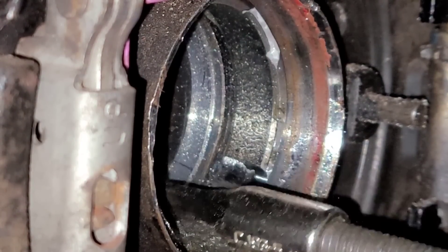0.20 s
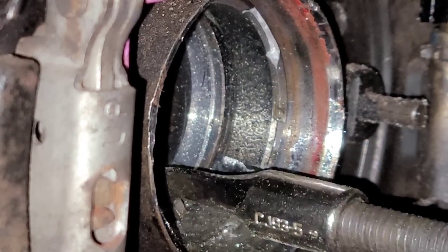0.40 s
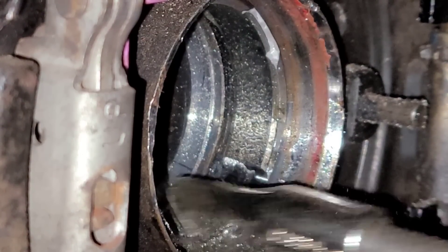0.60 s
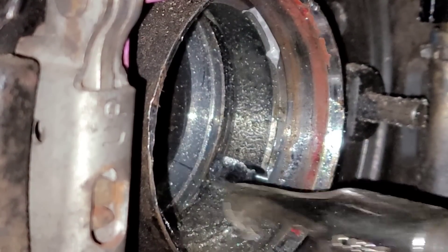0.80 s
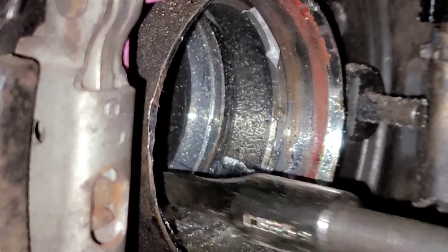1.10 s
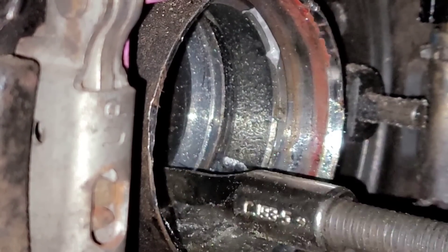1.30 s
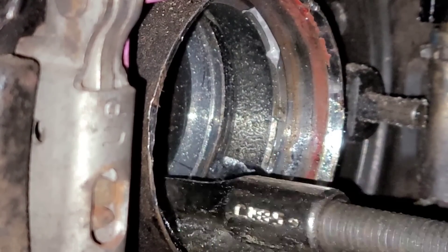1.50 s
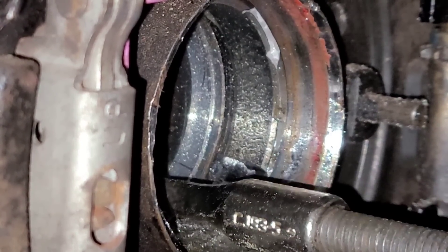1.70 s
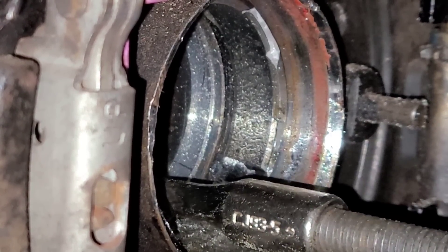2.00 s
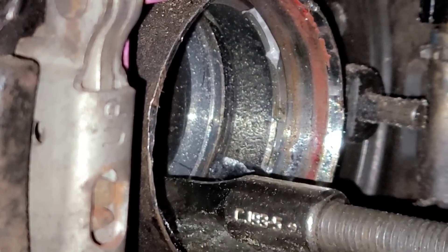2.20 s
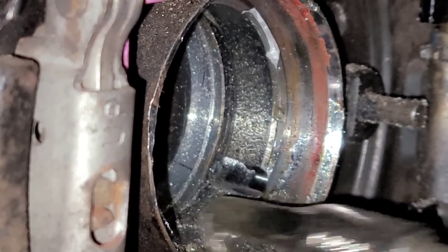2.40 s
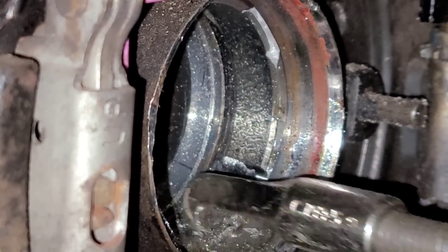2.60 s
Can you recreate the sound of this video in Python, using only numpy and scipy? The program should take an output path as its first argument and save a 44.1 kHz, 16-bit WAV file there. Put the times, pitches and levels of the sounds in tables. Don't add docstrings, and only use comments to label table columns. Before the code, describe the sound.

A small slide hammer slams its stop three times, sharp bright metal clacks with light rattling between

```python
import sys
import numpy as np
from scipy import signal
from scipy.fft import rfft, irfft
from scipy.io import wavfile
from scipy.ndimage import uniform_filter1d

SR = 44100
rng = np.random.default_rng(int(sys.argv[2]) if len(sys.argv) > 2 else 0)


def master_out(mix):
    frames = np.transpose(np.atleast_2d(mix))
    ceiling = np.clip(frames, -1, 1)
    pcm = np.round(ceiling * 32767).astype(np.int16)
    wavfile.write(sys.argv[1], SR, pcm)


def level_to_linear(level):
    exponent = np.asarray(level, float) / 20
    return 10 ** exponent


N = 119070
T = np.arange(N) / SR

# t/s, chatter level/dB, thump level/dB, sway level/dB, axle ring level/dB
BLOWS = [
    (0.224, -24, -55, -50, -35.5),
    (0.6476, -23.5, -42.5, -48, -33.5),
    (2.3895, -21.5, -45, -41, -41.5),
]
# f/Hz, spectral level/dB per Hz
STEEL = [(180, -39.5), (300, -3.5), (496, 2), (1450, -4), (3190, -3.5), (7260, -4.5), (13500, -1),
         (15700, 7), (16500, -42.5)]
# f/Hz, width/Hz, level/dB
ROD = [(3280, 68, -11.5), (3965, 300, -21), (6476, 400, -13), (8100, 300, -11.5), (10826, 310, -6),
       (11250, 200, -30), (11900, 250, -12), (13140, 250, -5), (13750, 480, -13), (16540, 610, -12.5)]


def unit(x):
    return x / np.sqrt(np.mean(x ** 2))


def curve(points, hz):
    p = np.array(points, float)
    return np.interp(np.log(hz + 1), np.log(p[:, 0]), p[:, 1])


def colour(x, points, scale=1):
    gain = level_to_linear(scale * curve(points, np.fft.rfftfreq(N, 1 / SR)))
    return irfft(rfft(x) * gain, N)


def ring(x, hz, width):
    r = np.exp(-np.pi * width / SR)
    a = [1, -2 * r * np.cos(2 * np.pi * min(hz, SR / 2.2) / SR), r * r]
    b = np.array([1, 0, -1]) * np.sqrt((1 - r * r) / 2)
    return signal.lfilter(b, a, x)


def body(x, modes, patchy_db=0):
    total = 0
    for k, (hz, width, db) in enumerate(modes):
        feed = x * level_to_linear(patchy_db * walk(25.21))
        total = total + (-1) ** k * level_to_linear(db) * ring(feed, hz, width)
    return total


def walk(rate):
    k = int(SR / rate)
    held = np.repeat(rng.standard_normal(N // k + 1), k)
    return 1.15 * uniform_filter1d(held, k)[:N]


def grit(db):
    clicks = rng.standard_normal((3, N)) * level_to_linear(db * rng.exponential(size=(3, N)))
    return unit(clicks[0] + 0.5 * clicks[1:])


def fall(s, tau):
    return (T >= s) * np.exp(-np.maximum(T - s, 0) / tau)


def pulse(s, rise_s, fall_s):
    return fall(s, fall_s) * (1 - fall(s, rise_s))


def pan(db):
    return level_to_linear(np.outer([0.5, -0.5], db))


def hammer():
    # hiss level/dB, then level/dB of each squeal band
    runups = [(-18, -22, -22, -17, -30), (-21.5, -25, -28, -23, -20), (-15, -25, -25, -28, -21)]
    # f/Hz, width/Hz
    squeal = [(3200, 400), (9000, 2100), (13600, 1500), (15500, 900)]
    # f/Hz, width/Hz, level/dB
    sings = [(10800, 300, -9), (10800, 500, -13), (13330, 200, -3)]
    blow_pan = [0, -1, -4]
    gap_s, skip_s = 0.0022, 0.0007
    rise_s, far_s, far_db = 0.0069, 0.09, -35
    hold_s, chatter_fall_s = 0.008, 0.0032
    rough = level_to_linear(2.2 * walk(700))
    steel, plain = unit(colour(grit(3.2), STEEL)), grit(1.1)
    impact, shimmer, rush, rings = 0, 0, 0, 0
    for (s, db, *_), (hiss_db, *squeal_db), sing in zip(BLOWS, runups, sings):
        lift = s - gap_s
        d = np.minimum(T - lift, 0)
        swell = np.exp(d / rise_s) + level_to_linear(far_db) * np.exp(d / far_s)
        up = rough * swell * np.where(T < lift, 1, fall(lift, skip_s))
        rush = rush + up * level_to_linear(hiss_db)
        squeals = sum(level_to_linear(b) * ring(plain, *band) for b, band in zip(squeal_db, squeal))
        chatter = (T >= s) * np.exp(-np.maximum(T - s - hold_s, 0) / chatter_fall_s)
        impact = impact + level_to_linear(db) * (chatter * rough + level_to_linear(6) * fall(s, 0.0012))
        shimmer = shimmer + level_to_linear(db - 10.5) * fall(s, 0.043)
        rings = rings + up * squeals + level_to_linear(db) * body(plain * fall(s, 0.044), [sing])
    side = pan(np.interp(T, [b[0] for b in BLOWS], blow_pan))
    cracks, tones = strikes(steel)
    rod = level_to_linear(3) * body(plain * (impact + level_to_linear(-4) * shimmer), ROD, 2.5)
    crash = side * (steel * (impact + rush + shimmer) + cracks)
    return crash, side * (tones + tails()) + rings + rod


def strikes(steel):
    # t/s, tone level/dB, tone f/Hz, crack level/dB
    contacts = [(.2108, -20, 13700, -34), (.2142, -17, 13800, -34), (.2153, -21, 9250, -34),
                (.2173, -9, 13600, -24), (.2206, -9, 13500, -26), (.2244, -7, 13200, -17),
                (.2250, -12, 10800, -30), (.2266, -13, 10700, -24), (.2288, -10, 13200, -26),
                (.2306, -12, 10800, -26), (.2345, -16, 13200, -30), (.6420, -17, 15200, -30),
                (.6435, -12, 3100, -28), (.6478, -12, 10900, -20), (.6508, -13, 11500, -17),
                (.6545, -17, 10800, -22), (.6590, -15, 11300, -30), (2.3770, -26, 3100, -36),
                (2.3800, -17, 10700, -34), (2.3830, -14, 3180, -30), (2.3855, -15, 3100, -29),
                (2.3897, -11, 3830, -18), (2.3903, -6, 10900, -22), (2.3938, -13, 13400, -22),
                (2.3968, -20, 10900, -24), (2.4000, -17, 13400, -28)]
    cracks, tones = 0, np.zeros((2, N))
    for s, db, hz, crack_db in contacts:
        tone = np.sin(2 * np.pi * hz * (T - s))
        tones = tones + level_to_linear(db) * 3 * pulse(s, 0.0005, 0.001) * tone
        cracks = cracks + level_to_linear(crack_db + 5) * fall(s, 0.0007) * steel
    return cracks, tones


def tails():
    # f/Hz, level/dB, t60/s
    first = [(3895, -44, .4), (6476, -39, .3), (8247, -42, .33), (13360, -32, .18), (15650, -33, .2)]
    # f/Hz, level/dB, t60/s
    second = [(4538, -42, .22), (6799, -41, .22), (8656, -36, .12), (10760, -42, .5), (15330, -40, .3)]
    # f/Hz, level/dB, t60/s
    third = [(688, -43, .7), (830, -36, .25), (6476, -40, .29), (11680, -35, .16), (13300, -36, .46)]
    tones = np.zeros((2, N))
    for (s, *_), modes in zip(BLOWS, (first, second, third)):
        for hz, db, t60 in modes:
            phase = 2 * np.pi * (hz * T + rng.random((2, 1)))
            tones = tones + level_to_linear(db + 4 * walk(60)) * fall(s, t60 / np.log(1000)) * np.sin(phase)
    return tones


def shove(start, hz, width, width_2):
    x = ring(ring(pulse(start, 0.002, 0.004), hz, width), hz, width_2)
    return 10 * x / np.abs(x).max()


def axle():
    # f/Hz, level/dB, t60/s
    axle_modes = [(209.13, 3.5, 0.32), (295.3, -7, 3.6), (370, -10.5, 5.0), (507.5, -3, 1.06),
                  (622, -23.5, 0.6), (701, -10, 0.1), (801, -5, 0.11)]
    # f/Hz, spectral level/dB per Hz
    bloom = [(50, -11), (90, -7), (140, -2), (220, 7.5), (330, 2), (500, -2.5), (800, -12), (1500, -22)]
    boom_level = [1.5, -1.5, -2.5]
    boom_long = [1, 2, -12]
    thump_late = [0, .006, 0]
    lag_s = np.array([[0.004], [0]])
    a = rng.standard_normal((3, N))
    frame = unit(colour(a[1:] + 0.5 * a[0], bloom))
    out = 0
    for blow, boom_db, long_db, late_s in zip(BLOWS, boom_level, boom_long, thump_late):
        s, _, thump_db, sway_db, ring_db = blow
        thump = level_to_linear(thump_db) * shove(s + late_s - 0.014 + lag_s / 2, 68, 40, 68) * pan(2.4)
        sway = -level_to_linear(sway_db) * shove(s + 0.006 + 2 * lag_s, 29, 34, 58) * pan(3.8)
        shake = rng.standard_normal(N) * fall(s, 0.05)
        rings = 0
        for hz, db, t60 in axle_modes:
            width = np.log(1000) / np.pi / min(t60, 0.8)
            rings = rings + level_to_linear(db) * unit(ring(shake, hz, width))
        decay = fall(s, 0.048) + level_to_linear(-17 + long_db) * fall(s, 0.32)
        boom = level_to_linear(5.5 + boom_db) * (1 - fall(s, 0.021)) * decay * frame
        out = out + thump + sway + level_to_linear(ring_db) * (level_to_linear(-27.5) * rings + boom)
    return out


def hook():
    # t/s, peak level/dB, treble level/dB, hub level/dB
    ticks = [(0.1718, -17, -27, -48), (0.6047, -36, -44, -40), (0.8887, -32.5, -26, -47),
             (0.9307, -37.5, -26.5, -65), (1.0041, -36.5, -68, -40.5), (1.0985, -35.5, -46, -50),
             (1.2135, -44.5, -23, -56.5), (1.268, -36, -28, -69), (1.3245, -33, -66, -52),
             (1.3411, -38, -46, -56), (1.599, -33, -55, -36), (1.7005, -54.5, -57, -73),
             (1.8688, -37.5, -58.5, -54.5), (2.149, -39, -95, -46.5), (2.3395, -40, -38, -42),
             (2.42, -50, -60, -26), (2.5147, -29.5, -38, -36)]
    # start t/s, length/s, hook level/dB, hub level/dB, hiss level/dB
    scrapes = [(-.06, 0.16, -72, -63, -60.5), (0.07, 0.11, -54, -59, -71), (0.212, 0.04, -54, -73, -52.5),
               (0.535, 0.13, -60.5, -49, -71), (0.61, 0.1, -43, -57, -37.5), (0.867, 0.062, -55, -62, -52),
               (0.974, 0.092, -61.5, -62, -74.5), (1.116, 0.11, -59.5, -68, -62.5),
               (1.313, 0.056, -57, -61, -57), (1.795, 0.059, -72, -74, -69), (1.862, 0.11, -62, -56.5, -62),
               (2.002, 0.099, -64, -57.5, -59.5), (2.059, 0.12, -56.5, -51, -57),
               (2.12, .08, -60, -54, -66), (2.18, 0.1, -59, -52, -63), (2.24, 0.07, -54, -62, -57),
               (2.325, .05, -60, -50, -55)]
    # f/Hz, width/Hz, level/dB
    hook_modes = [(1665, 90, 1.5), (1857, 57, 1.5), (2021, 210, -7.5), (2523, 150, -15), (3100, 150, -10),
                  (3650, 120, -12), (4400, 500, -11), (1330, 56, -9)]
    # f/Hz, width/Hz, level/dB
    hub_modes = [(487, 120, -10), (590, 35, -5), (691, 30, -4), (815, 50, -6), (1050, 160, -17)]
    # f/Hz, width/Hz, level/dB
    ping = [(1838, 120, -1), (2020, 220, -8.5), (1570, 150, -10), (3100, 500, -20), (4700, 500, -20)]
    tap, mid, top, low = np.zeros(N), 0, 0, 0
    for s, db, top_db, low_db in ticks:
        tap[int(s * SR)] = 5 * level_to_linear(db - 2)
        mid = mid + level_to_linear(db - 16) * fall(s, 0.0084)
        top = top + level_to_linear(top_db - 11) * 2 * fall(s, 0.0023)
        low = low + level_to_linear(low_db - 4) * fall(s, 0.018)
    stutter = level_to_linear(2 * walk(70))
    edge_s = 0.02
    for s, length, db, low_db, top_db in scrapes:
        progress = np.clip((T - s + edge_s / 2) / (length + edge_s), 0, 1)
        env = np.sin(np.pi * progress ** 0.63) ** 2 * stutter
        mid = mid + level_to_linear(db) * env
        low = low + level_to_linear(low_db) * env
        top = top + level_to_linear(top_db) * env
    bright = grit(2) * top
    hub = ring(body(grit(2) * low, hub_modes, 2.5), 880, 1000) / 4
    knocks = body(grit(2) * mid, hook_modes, 2.5) + body(tap[None], ping)
    hiss = 0.7 * colour(bright, STEEL)
    ringing = 0.5 * body(bright, ROD + [(8960, 890, -3), (13500, 310, -1)])
    return ring(knocks, 2800, 2900) / 2 + hub + hiss + ringing


def garage(x):
    # f/Hz, t60/s
    room_t60 = [(60, 1.88), (250, 0.72), (1000, 0.34), (4000, 0.61), (10000, 0.56), (16000, 0.32)]
    # f/Hz, level/dB
    room_tilt = [(100, 0.033), (1000, 0.0088), (4000, 0.0064), (16000, 0.0033)]
    t, ir = T[:SR], 0
    for hz in 60 * 2 ** np.arange(0, 8.1, 0.5):
        band = ring(ring(rng.standard_normal((2, SR)), hz, hz / 2.1), hz, hz / 2.1)
        decay = level_to_linear(curve(room_tilt, hz) - 60 * t / curve(room_t60, hz))
        ir = ir + unit(band) * np.sqrt(hz) * decay
    ir = ir * np.clip(t / 0.0027, 0, 1) ** 2
    ir = ir / np.sqrt(np.sum(ir ** 2) / 2)
    return level_to_linear(-9.5) * signal.fftconvolve(x.mean(axis=0)[None], ir, axes=1)[:, :N]


def hum():
    # f/Hz, spectral level/dB per Hz
    rumble = [(12, -22.5), (20, 2), (184, 0), (452, -26.5), (2440, -31), (5070, -44), (12800, -24),
              (15200, -22.5), (16500, -28.5)]
    # f/Hz, width/Hz, level/dB
    lines = [(169, 6, -64), (214, 8, -68), (296.8, 6.4, -74.5), (13200, 1500, -70), (9400, 600, -81)]
    a = rng.standard_normal((3, N))
    out = level_to_linear(-57.5 + 3.9 * walk(7.2)) * unit(colour(a[1:] + 0.58 * a[0], rumble))
    for hz, width, db in lines:
        b = rng.standard_normal((3, N))
        out = out + level_to_linear(db) * unit(ring(b[0] + 1.2 * b[1:], hz, width))
    return out


def scene():
    # f/Hz, left-right level/dB
    port_tilt = [(300, 2), (1000, -2), (2500, -5.5), (5000, 1.5), (13000, 7)]
    (crash, rings), small, low = hammer(), hook(), axle()
    near = crash + rings + small
    left = np.roll(colour(near[0], port_tilt, scale=0.35), int(0.00045 * SR))
    right = colour(near[1], port_tilt, scale=-0.59)
    echo = garage(1.74 * crash + 0.7 * rings + level_to_linear(-6) * small + low / 2)
    return np.array([left, right]) + low + echo + hum()


def band_limit(x):
    return signal.sosfilt(signal.butter(12, 17000, fs=SR, output="sos"), x)


def record(dry):
    low_pass = signal.ellip(8, 0.3, 45, 15900, fs=SR, output="sos")
    cut = signal.sosfilt(low_pass, dry)
    limit = 1.2
    mix = limit * np.tanh(cut / limit)
    return band_limit(mix)


dry = scene()
out = record(dry)
master_out(out)
```